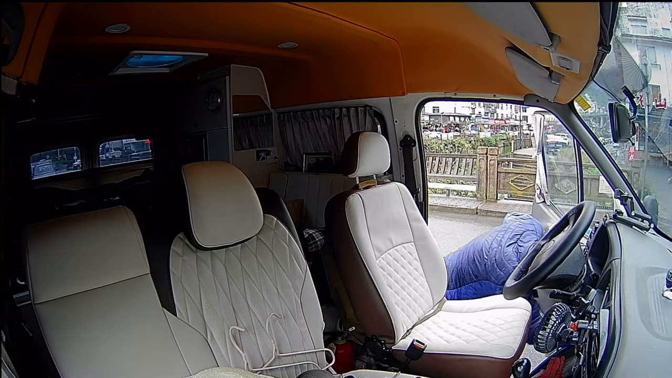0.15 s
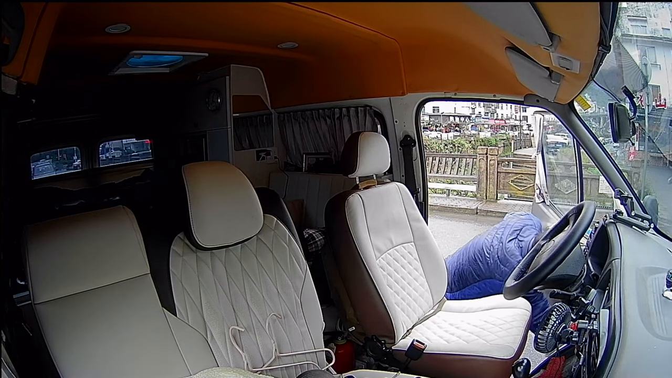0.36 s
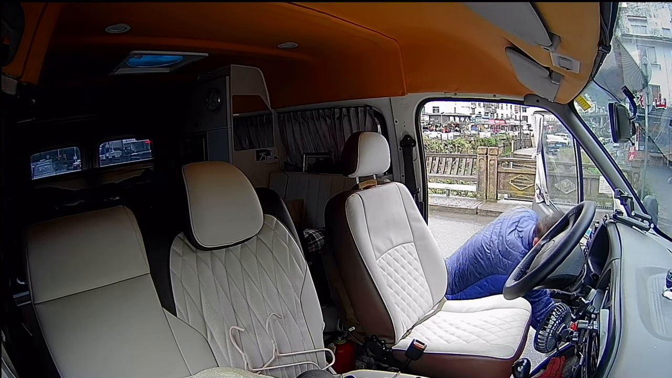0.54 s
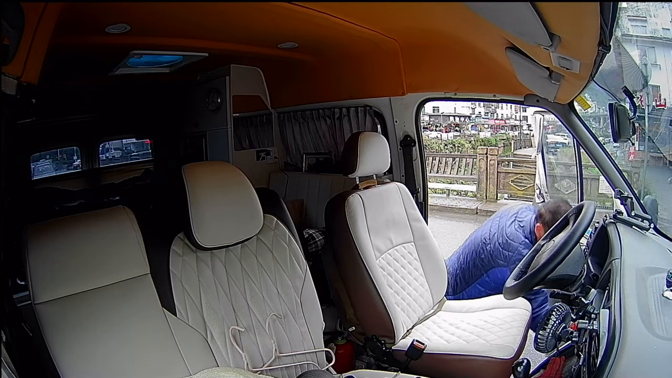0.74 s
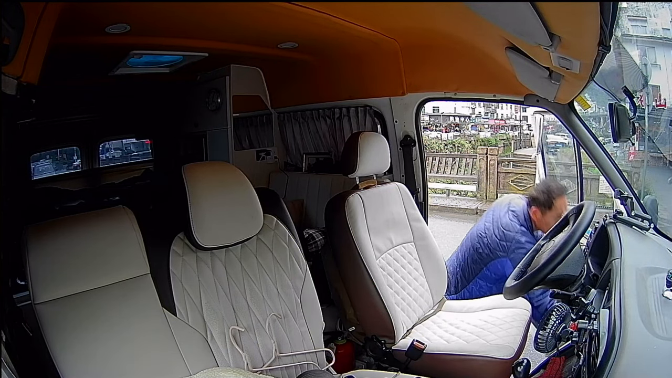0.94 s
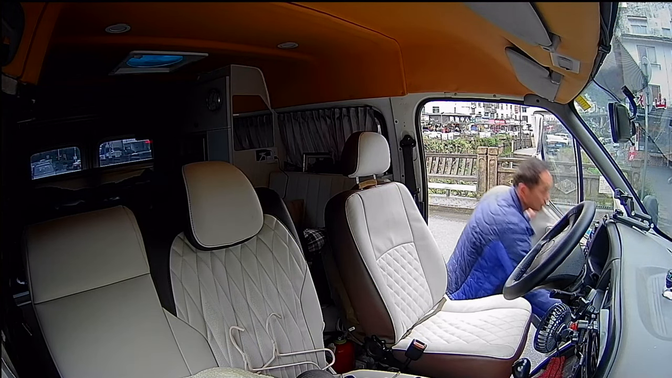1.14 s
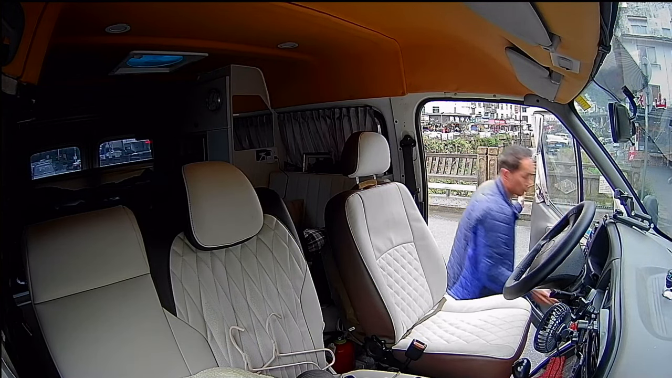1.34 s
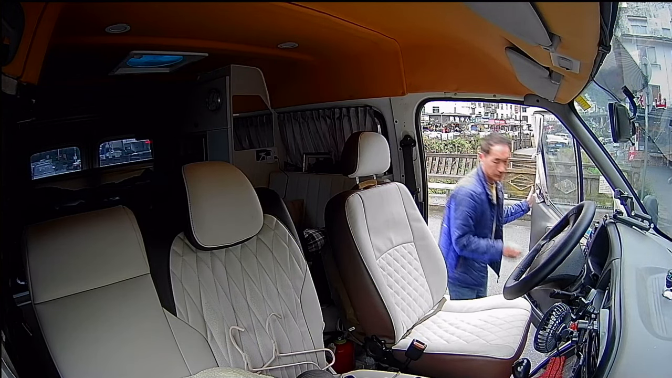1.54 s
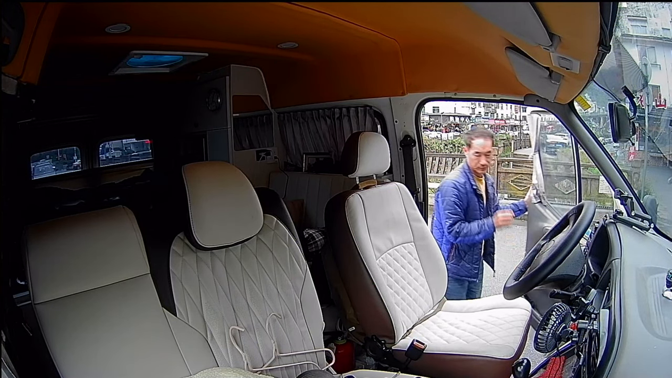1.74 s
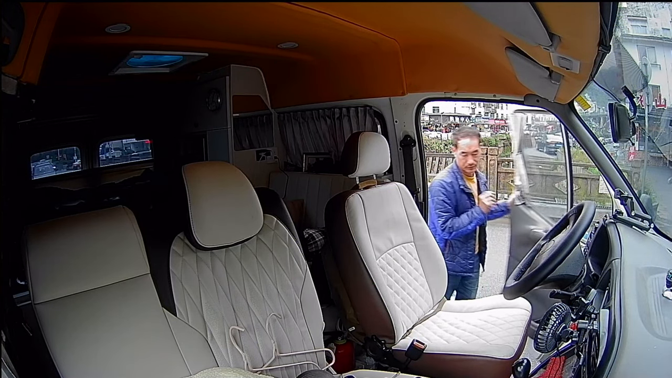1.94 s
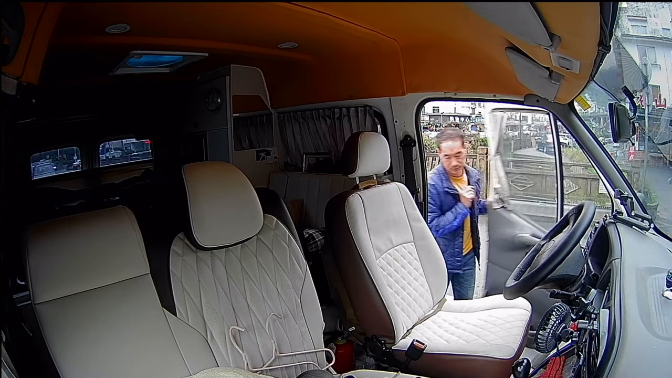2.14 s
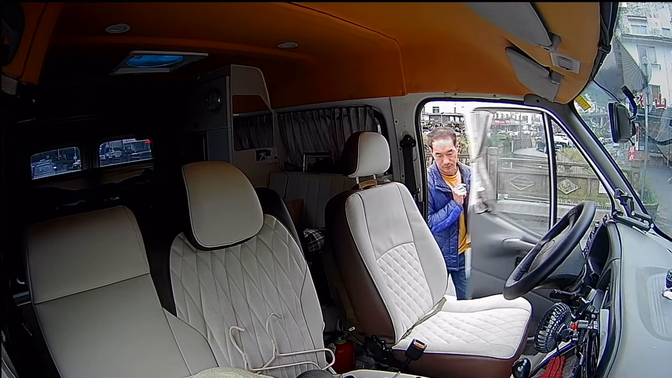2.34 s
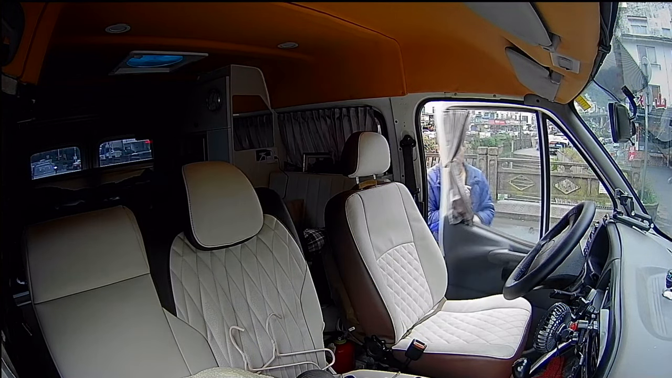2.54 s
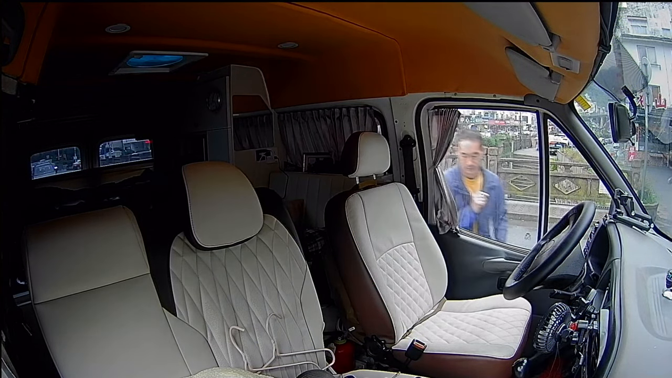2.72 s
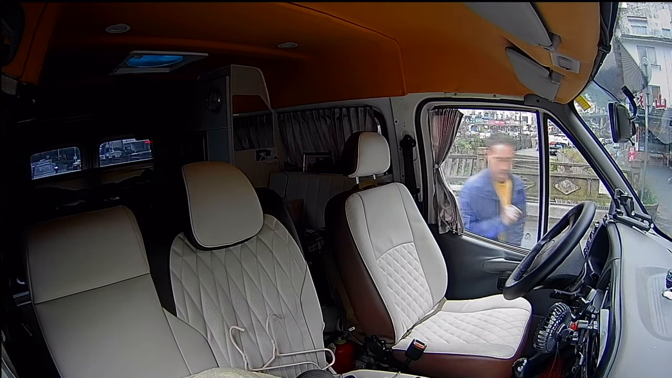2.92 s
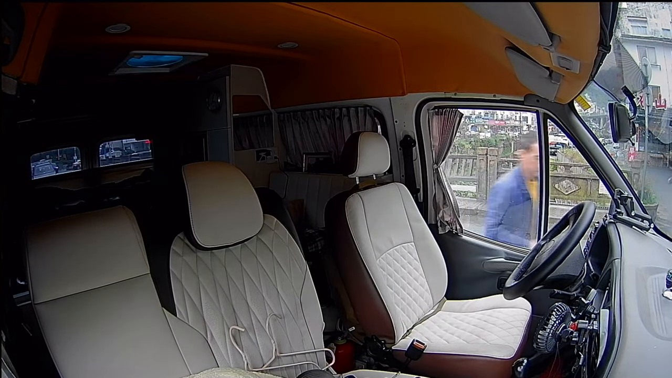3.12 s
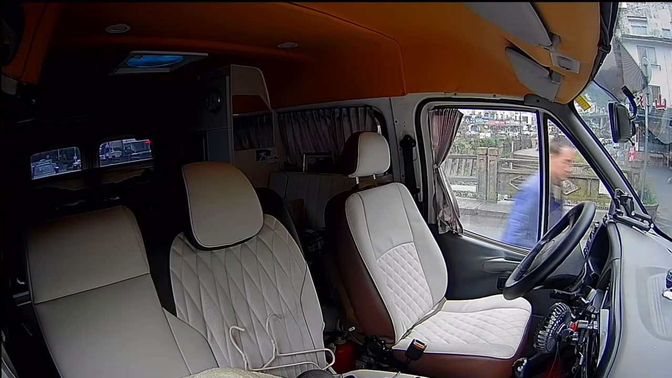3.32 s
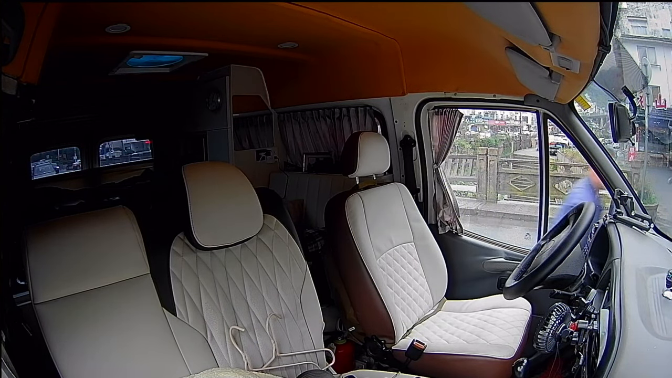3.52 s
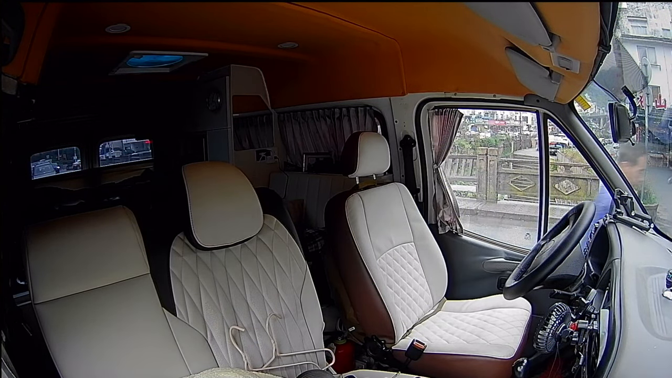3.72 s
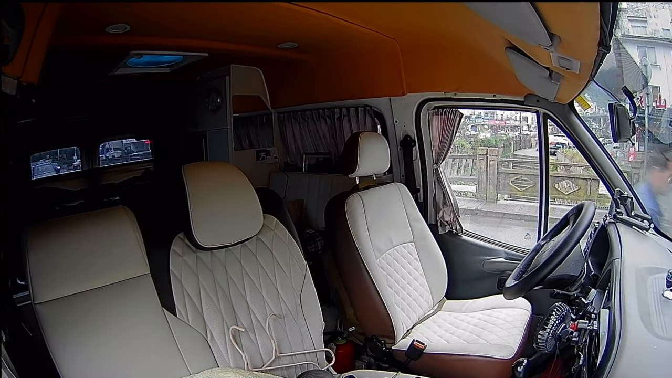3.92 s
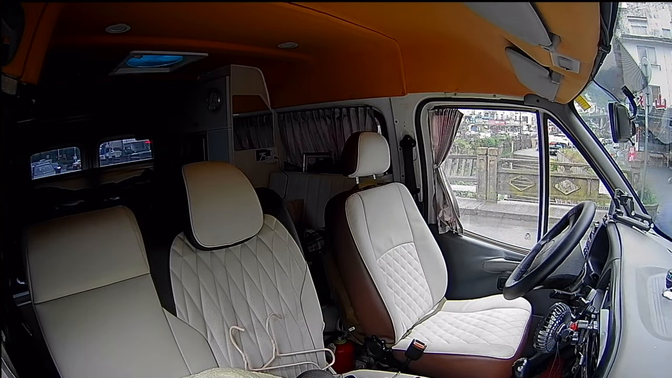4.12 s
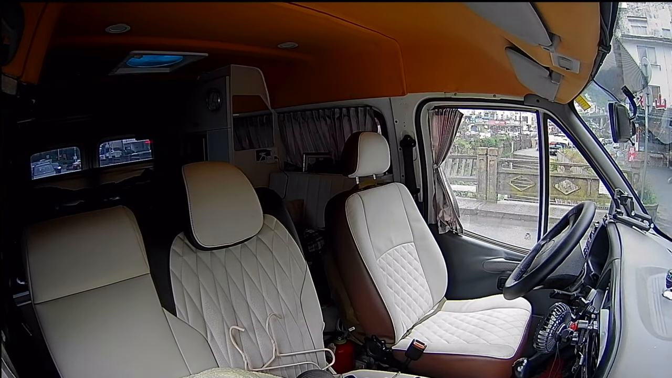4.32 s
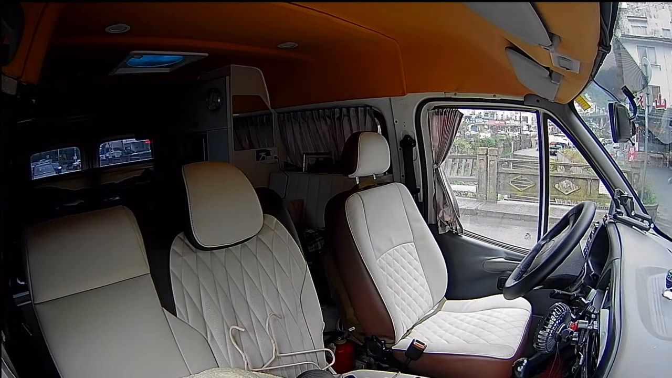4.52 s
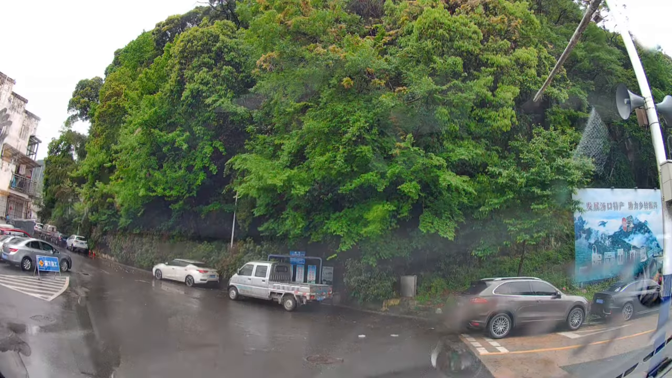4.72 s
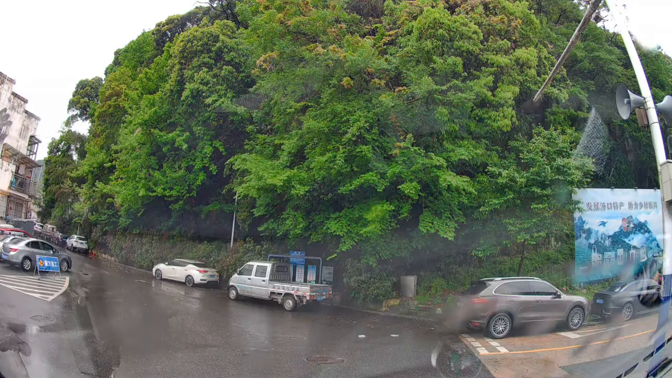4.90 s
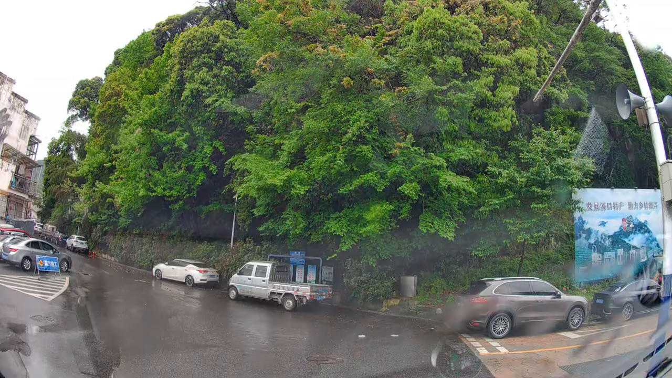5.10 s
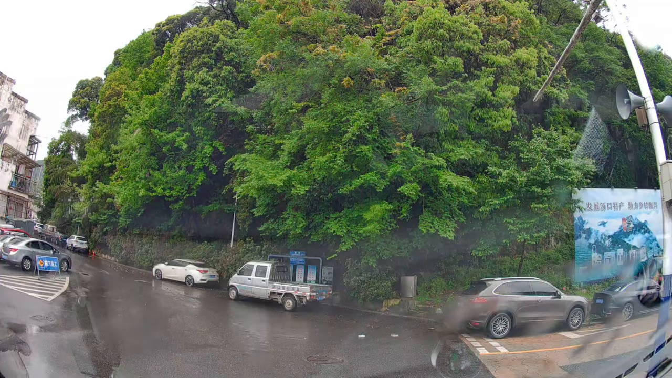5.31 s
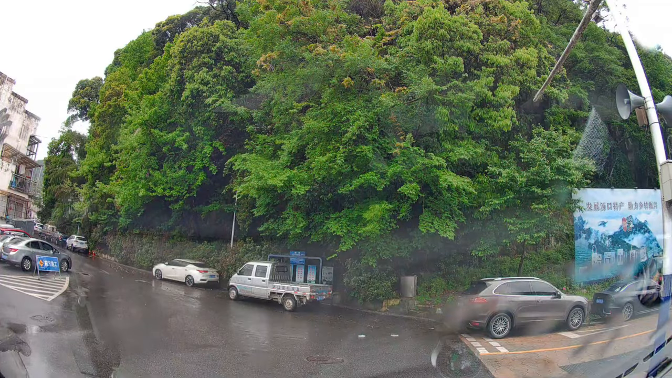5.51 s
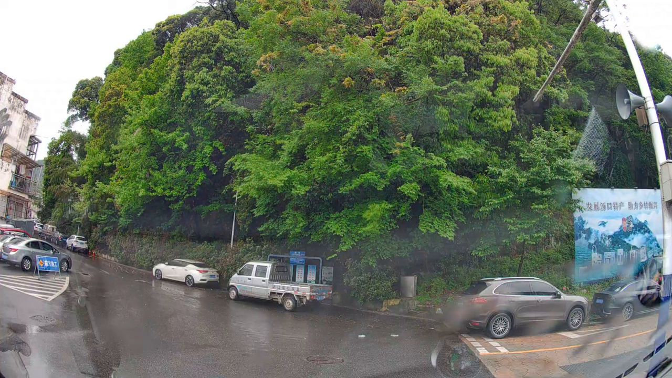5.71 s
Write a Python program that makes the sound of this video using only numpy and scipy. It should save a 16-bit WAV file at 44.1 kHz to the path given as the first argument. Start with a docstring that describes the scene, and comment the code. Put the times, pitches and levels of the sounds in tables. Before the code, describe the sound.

Inside a parked, idling van, padded knocks and a dull thump precede a loud, rattling door slam, then a sudden second bang.

```python
"""Inside a parked van: a low sine throbs for the idling engine, filtered noise hisses in at an open front door.
Bursts of tiny contacts make knocks on the trim and a dull thump as a part under the dash is pulled and lets go.
The door swings shut and closes off the street: air is pushed in, the latch crashes over ringing steel, panels
rattle, loose fittings click and the cabin booms in decaying modes, overloading the microphone.
Later the sound skips back with a pop, and the end of the slam is heard once more as an abrupt bang."""
import sys
import numpy as np
from scipy import signal
from scipy.fft import rfft, irfft
from scipy.io import wavfile
from scipy.ndimage import uniform_filter1d

SR = 44100
rng = np.random.default_rng(int(sys.argv[2]) if len(sys.argv) > 2 else 0)


def dump_mix(stems):
    """Bounce the given channels to the path in sys.argv[1] as a 16-bit WAV at rate SR."""
    frames = np.atleast_2d(stems).T  # one column per channel
    limited = np.clip(frames, -1, 1)  # hard clip at full scale
    pcm = np.round(limited * 32767).astype(np.int16)
    wavfile.write(sys.argv[1], SR, pcm)


N = 258204
T = np.arange(N) / SR

# spectrum of blows and drags on padded trim: (f/Hz, density/dB per Hz)
TRIM_SPECTRUM = [(40, -9.5), (100, -2.5), (280, -3.5), (450, -7), (900, -12), (1600, -20.5), (2900, -24),
                 (5000, -30.5), (7200, -25), (9000, -47)]
# spectrum of shaking panels and loose fittings: (f/Hz, density/dB per Hz)
RATTLE_SPECTRUM = [(60, 4), (130, 8), (250, -2), (350, -8.5), (550, -1.5), (750, -9), (1200, -8),
                   (1700, -15), (4000, -17), (5500, -19), (7200, -17), (8400, -32)]
# resonances of the floor pan: (f/Hz, level/dB, t60/s)
FLOOR_MODES = [(56, -5.5, 0.28), (84, -1.5, 0.13), (147, 0, 0.1), (169, -6.5, 0.083)]


def undb(db):
    """Decibels to gain."""
    return 10 ** (np.asarray(db) / 20)


def unit(x):
    """Scale to rms 1."""
    return x / np.sqrt(np.mean(x ** 2))


def fade(t, t60):
    """Exponential decay, 60 dB down after t60 (at least 2 ms)."""
    return np.exp(-np.log(1000) * t / max(t60, .002))


def on_log(hz, points):
    """Read (f/Hz, value) points on a log-frequency axis."""
    f, value = np.transpose(points)
    return np.interp(np.log(hz + 1), np.log(f), value)


def add(track, s, sound):
    """Mix a sound into a track at a time in seconds."""
    i = int(s * SR)
    track[i:i + len(sound)] += sound[:N - i]


def through(x, response):
    """Pass a sound through an impulse response, keeping its length."""
    return signal.oaconvolve(x, response)[:len(x)]


def colour(points, tilt=0, top_hz=SR, peak_hz=1000, peak_db=0, octaves=1, size=4096):
    """Causal response of unit energy with a given spectrum, tilt (dB/octave), upper edge and one resonance."""
    hz = np.arange(size // 2 + 1) * SR / size + 1
    db = on_log(hz, points) + tilt * np.log2(np.clip(hz, 100, 8000) / 1000)
    db = db + peak_db / (1 + (np.log2(hz / peak_hz) / octaves) ** 2)
    low_cut = 1 + (points[0][0] / hz / 2) ** 2
    high_cut = np.sqrt(1 + (hz / top_hz) ** 16)
    gain = undb(db) / low_cut / high_cut
    # folding the cepstrum gives minimum phase, so the energy comes early
    cepstrum = irfft(np.log(gain))
    cepstrum[1:size // 2] *= 2
    cepstrum[size // 2 + 1:] = 0
    response = irfft(np.exp(rfft(cepstrum)))
    return response / np.linalg.norm(response)


def modes(table):
    """Impulse response of a set of decaying resonances (f/Hz, level/dB, t60/s)."""
    t = T[:int(SR * max(t60 for _, _, t60 in table))]
    return sum(undb(db) * np.sin(2 * np.pi * hz * t) * fade(t, t60) for hz, db, t60 in table)


def chatter(length, grain_db, rise=0, hold=0):
    """Half a second of tiny contacts of uneven size that builds up, holds and dies away (times in s)."""
    t = T[:SR // 2]
    grains = undb(grain_db * rng.standard_normal(len(t) // 50 + 1))
    sizes = np.repeat(grains, 50)[:len(t)]
    contacts = unit(rng.standard_normal(len(t)) * sizes)
    return contacts * fade(np.maximum(t - hold, 0), length) * (1 - fade(t, rise))


def wander(rate):
    """Slow random drift of rms 1, from random steps at a rate in Hz, smoothed twice."""
    k = int(SR / rate)
    steps = np.repeat(rng.standard_normal(N // k + 1), k)
    return unit(uniform_filter1d(uniform_filter1d(steps, k), k)[:N])


def doorway():
    """Open share of the doorway, 1 to 0: the swing speeds up evenly until the door is shut."""
    swing_at, shut_at = 1.2, 2.86  # s
    return 1 - np.clip((T - swing_at) / (shut_at - swing_at), 0, 1) ** 2


def hush():
    """The cabin's own faint hush: steady coloured noise with a slight drift in level."""
    # (f/Hz, density/dB per Hz)
    spectrum = [(60, 4), (100, -3.5), (170, 0), (270, 1), (450, -4), (800, -9.5), (1300, -11),
                (1800, -17.5), (3300, -17), (5000, -18.5), (7200, -15.5), (8400, -29), (9500, -47)]
    return through(rng.standard_normal(N), colour(spectrum)) * undb(-55 + .5 * wander(7.5))


def rumble():
    """Steady low rumble: noise that falls away steeply above the bass."""
    bass = colour([(20, -9.5), (45, -7), (90, -23.0), (400, -68.0)])
    return undb(-44.5) * through(rng.standard_normal(N), bass)


def ticking():
    """Faint, thin ticks of uneven strength, about eight a second, each a soft-edged burst of contacts."""
    out, times = np.zeros(N), np.arange(.1, N / SR, .125)
    for s, (late, strength) in zip(times, rng.standard_normal((len(times), 2))):
        tick = chatter(0.2, grain_db=4.5, rise=0.012)
        add(out, s + 0.0024 * late, undb(-54.5 + 1.5 * strength) * tick)
    thin = [(3000, -27), (4400, -10.5), (5000, -0.5), (5700, -11.5), (6400, -4), (7200, -0.5), (8200, -14.5)]
    return through(out, colour(thin))


def street():
    """Street hiss: drifting noise whose amplitude follows the root of the open share of the doorway."""
    # (f/Hz, density/dB per Hz)
    spectrum = [(80, -1), (170, -4.5), (300, -5), (450, -4.5), (700, -5), (1300, -7.5), (1600, -13.5),
                (2200, -12), (2800, -19), (3600, -19), (5500, -17), (7200, -12), (8400, -26), (9500, -41.5)]
    hiss = through(rng.standard_normal(N), colour(spectrum))
    return hiss * np.sqrt(doorway()) * undb(-36 + .4 * wander(4.0))


def engine():
    """Idling throb: one low sine, unsteady in pitch and level, quieter once the door is shut."""
    idle_hz, open_db, shut_db = 33.4, -33, -39.5  # centres of the drift
    turn = 2 * np.pi * np.cumsum(idle_hz * (1 + 0.024 * wander(4.6))) / SR
    level_db = shut_db + (open_db - shut_db) * np.sqrt(doorway())
    return unit(np.sin(turn)) * undb(level_db + 1.9 * wander(13))


def knocks():
    """Padded blows of feet, lever and trim; duller ones last longer and drum more on the floor pan."""
    # (t/s, level/dB ahead of the gains below, hardness as tilt/dB per octave, own resonance f/Hz)
    blows = [(0.497, -23.5, 0.3, 413), (.648, -20.5, 1.3, 1150), (0.661, -20, 0, 2800),
             (0.715, -18, 2, 250), (.766, -19.5, -0.4, 1200), (1.087, -20.5, -0.2, 303),
             (1.537, -37, -1, 304), (2.468, -28.5, -3, 540), (2.713, -22.5, -2.6, 660)]
    flat_length, halving_tilt = .115, 1.9  # t60 in s at tilt 0; dB/octave that halves it
    out, pan = np.zeros(N), modes(FLOOR_MODES)
    for s, db, tilt, hz in blows:
        length = flat_length * 2 ** (-tilt / halving_tilt)
        scuff = chatter(length, grain_db=2.0, rise=0.12 * length)
        trim = colour(TRIM_SPECTRUM, tilt, peak_hz=hz, peak_db=9.5, octaves=.2)
        add(out, s, undb(db + 1.5) * through(scuff, trim))
        add(out, s, undb(db - 2.1 * tilt - 15.5) * pan)
    return out


def thump():
    """A part under the dash swells as it is pulled and dies when it lets go; the floor pan drums on."""
    at, rise, hold = .672, 0.32, 0.11  # s
    out, pan = np.zeros(N), modes(FLOOR_MODES)
    drag = chatter(.25, grain_db=5.5, rise=rise, hold=hold)
    dull = colour(TRIM_SPECTRUM, tilt=-2.84, peak_hz=293, peak_db=3, octaves=0.27)
    add(out, at, undb(-14.5) * through(drag, dull))
    shake = chatter(0.32, grain_db=2.5, rise=rise, hold=hold)
    add(out, at, undb(-15) * through(shake, pan / np.linalg.norm(pan)))
    return out


def latch():
    """The latch hits its first catch, its second, and rebounds: short, hard-edged bursts of grinding."""
    # (t/s, level/dB, grinding/s, upper edge f/Hz)
    hits = [(2.762, -3, 0.0095, 4464), (2.781, -6, .009, 9107), (2.806, -17, 0.017, 9000)]
    # (f/Hz, density/dB per Hz)
    spectrum = [(100, -10), (280, -12), (390, 2.5), (700, -3.5), (1100, 3.5), (1600, -4), (3200, -3),
                (4400, 1.5), (5300, -7.5), (6400, -0.5), (7400, 9), (8200, -7)]
    out = np.zeros(N)
    for s, db, hold, top_hz in hits:
        crash = chatter(.035, grain_db=1.5, rise=0.0022, hold=hold)
        add(out, s, undb(db) * through(crash, colour(spectrum, tilt=-0.48, top_hz=top_hz)))
    return out


def rattle():
    """Panels shudder in surges as the cabin's air pressure swings; loose fittings click as they settle."""
    # door skin, then window and trim: (t/s, level/dB about which it surges, held/s, own resonance f/Hz)
    shudders = [(2.822, -13.5, 0.036, 250), (2.873, -16.5, 0.049, 438)]
    # clicks: (t/s, level/dB, own resonance f/Hz)
    clicks = [(2.994, -22.5, 2140), (3.031, -28.5, 3560), (3.083, -37.5, 7030), (3.158, -42.5, 2423)]
    surge_hz, surge_db = 42.3, 2.5  # rate and depth of the surges
    out = np.zeros(N)
    for s, db, hold, hz in shudders:
        shake = chatter(.25, grain_db=2, rise=.053, hold=hold)
        surges = undb(db + surge_db * np.sin(2 * np.pi * surge_hz * T[:len(shake)]))
        panel = colour(RATTLE_SPECTRUM, tilt=.1, peak_hz=hz, peak_db=8.5, octaves=0.3)
        add(out, s, through(shake * surges, panel))
    for s, db, hz in clicks:
        click = undb(db) * chatter(.063, grain_db=2.0, rise=0.0054)
        fitting = colour(RATTLE_SPECTRUM, tilt=0.4, peak_hz=hz, peak_db=13.5, octaves=0.16)
        add(out, s, through(click, fitting))
    return out


def door():
    """Latch and rattle, heard directly and through the decaying resonances of the door's steel."""
    # (f/Hz, level/dB ahead of scaling the whole set to unit energy, t60/s)
    steel_modes = [(386, 12, 0.13), (600, -11.5, .12), (870, -3.5, 0.13), (1080, 6.5, 0.021),
                   (1238, -4, 0.16), (1950, -3, .08), (3400, 6, 0.083), (3560, -2.5, 0.11), (3900, -5, .08),
                   (4820, 1, 0.092), (7350, 2, 0.15), (6660, -1, 0.091), (6870, -5.5, 0.17),
                   (7340, -4, 0.032), (7636, 2, .1)]
    crash, shaking, steel = latch(), rattle(), modes(steel_modes)
    drive = undb(-16.0) * crash + undb(-31) * shaking
    return crash + shaking + through(drive, steel / np.linalg.norm(steel))


def boom():
    """The swinging door piles up air in the cabin; each shove rocks air and panels at their lowest modes."""
    # (t/s, level/dB, contact/s)
    shoves = [(0.742, -7, 0.013), (0.78, -4, 0.0099), (2.788, -0.5, 0.013), (2.838, -3.5, 0.0051),
              (2.888, -7.5, 0.0026)]
    # cabin air and large panels: (f/Hz, level/dB, t60/s)
    cabin_modes = [(19.79, -6, 1.355), (25.2, -21, 1.1), (39.14, -8, 0.56), (43.67, -10.5, 1.4),
                   (50.3, -20.5, 1.4), (56, -20, 0.82), (70.3, -6, 0.79), (86, -3.5, 0.25),
                   (113.4, -20, .85), (143.7, -27, 1.2)]
    force, pressure = np.zeros(N), np.zeros(N)
    for s, db, contact in shoves:
        push = np.hanning(int(contact * SR) + 3)
        add(force, s, undb(db) * push / push.sum())
    add(pressure, 2.655, undb(-8.5) * np.hanning(int(.14 * SR)))
    return pressure - through(force, modes(cabin_modes))


def cabin_ring():
    """Diffuse tail of the upholstered cabin: octave bands of decaying noise; the bass stays longest."""
    # (f/Hz, t60/s)
    decay_times = [(60, 1), (200, 0.78), (500, 0.21), (2000, 0.33), (8000, 0.46)]
    t, tail = T[:SR], 0
    for hz in 60 * 2 ** np.arange(8):
        band = signal.butter(3, [hz / np.sqrt(2), hz * np.sqrt(2)], "band", fs=SR, output="sos")
        noise = signal.sosfilt(band, rng.standard_normal(len(t)))
        tail = tail + noise * fade(t, on_log(hz, decay_times))
    tail = tail * (1 - fade(t, 0.039))  # the tail builds up softly
    return tail / np.linalg.norm(tail)


def skip(x):
    """The sound jumps back into the end of the slam, with a hard pop, a short hollow thud and a noise burst."""
    # hollow thud: (f/Hz, level/dB ahead of its gain, t60/s)
    thud_modes = [(435, -11.5, 0.033), (561, -10.5, 0.029), (614.5, -13, 0.06), (795, -28, 0.023),
                  (1183, -15.5, 0.034)]
    skip_at, skip_back = 4.658, 1.736  # s
    cut, back = int(skip_at * SR), int(skip_back * SR)
    out = np.concatenate([x[:cut], x[cut - back:N - back]])
    add(out, skip_at, -undb(1.5) * fade(T[:SR // 10], 0.023))
    add(out, skip_at + 0.00307, undb(-4.5) * modes(thud_modes))
    burst = through(chatter(0.015, grain_db=-2.0), colour(RATTLE_SPECTRUM, tilt=-0.59, top_hz=8240))
    add(out, skip_at, undb(-13.0) * burst)
    return out


def scene():
    """All sources in the cabin; knocks, thump and door share its upholstered ring."""
    background = street() + hush() + engine() + rumble() + ticking()
    trim, slam = knocks() + thump(), door()
    ring = through(undb(-13.5) * trim + undb(-15) * slam, cabin_ring())
    return (background + trim + slam + ring + boom())[None]


def record(dry):
    """A narrow-band microphone channel that skips once and clips hard on the bangs."""
    mic_top_hz, top_hz = 8370, 16000  # edges of the microphone and of the clipped output
    heard = signal.sosfilt(signal.butter(20, mic_top_hz, fs=SR, output="sos"), dry[0])
    clipped = np.clip(skip(heard), -1, 1)
    return signal.sosfilt(signal.ellip(8, .2, 70, top_hz, fs=SR, output="sos"), clipped)[None]


dry = scene()
out = record(dry)
dump_mix(out)
```